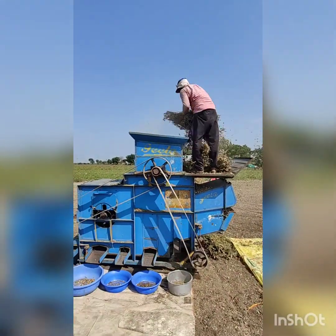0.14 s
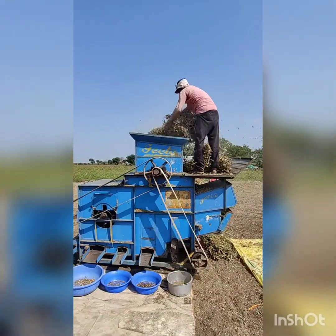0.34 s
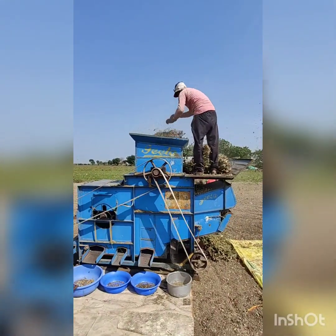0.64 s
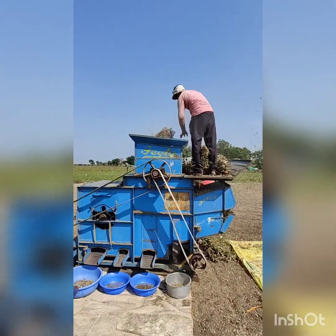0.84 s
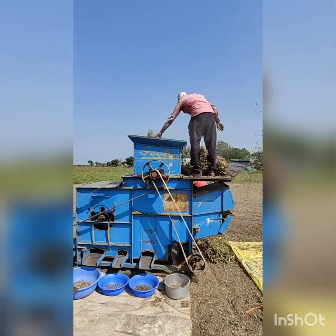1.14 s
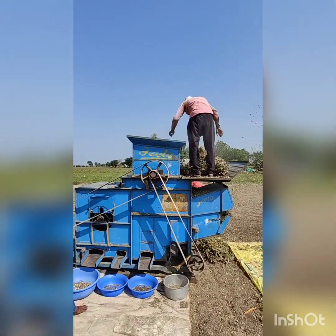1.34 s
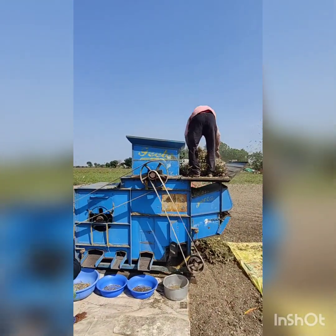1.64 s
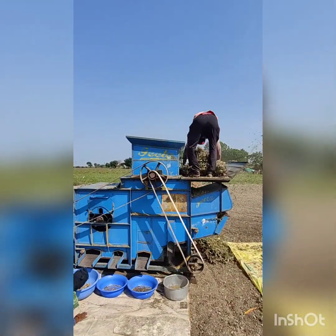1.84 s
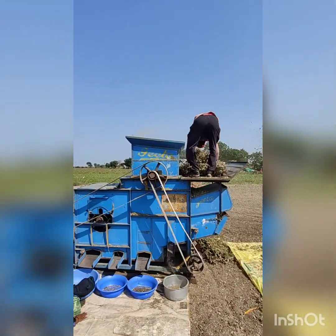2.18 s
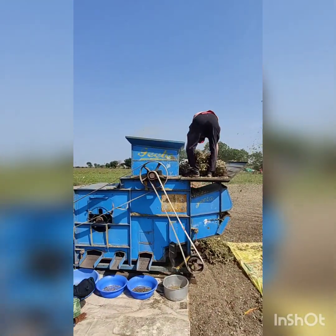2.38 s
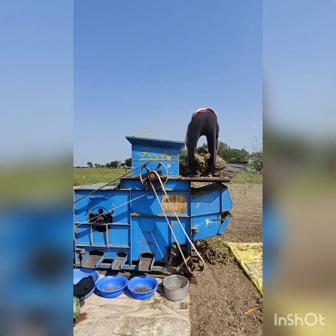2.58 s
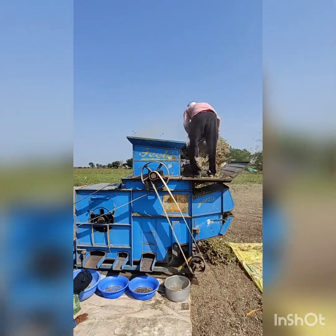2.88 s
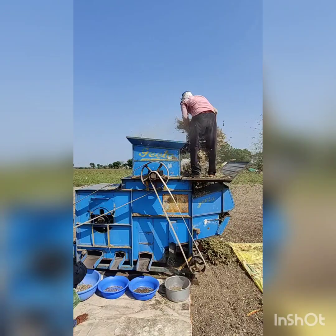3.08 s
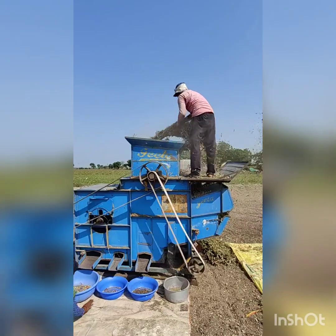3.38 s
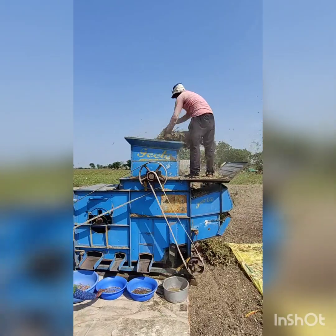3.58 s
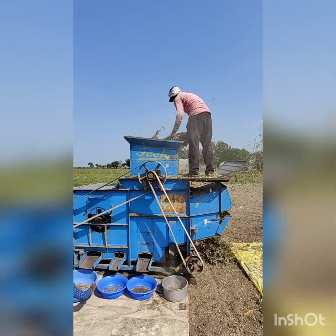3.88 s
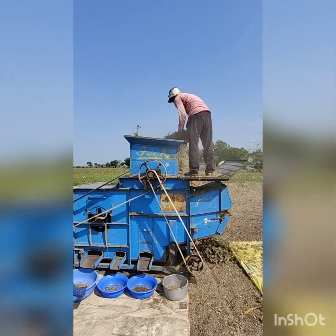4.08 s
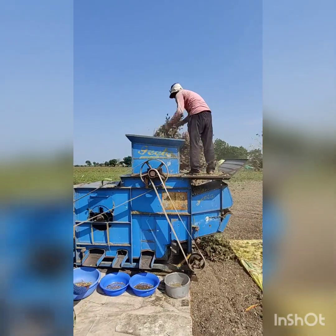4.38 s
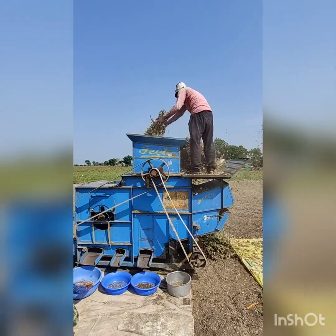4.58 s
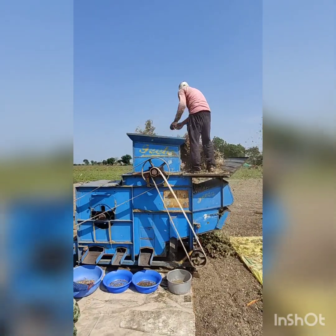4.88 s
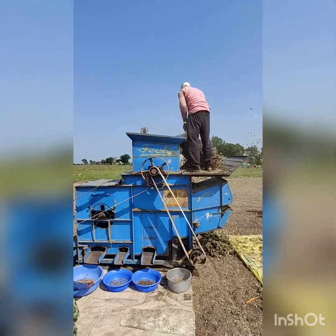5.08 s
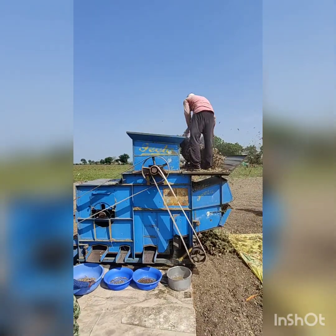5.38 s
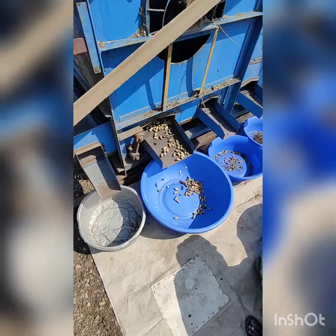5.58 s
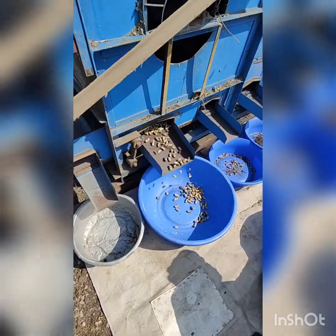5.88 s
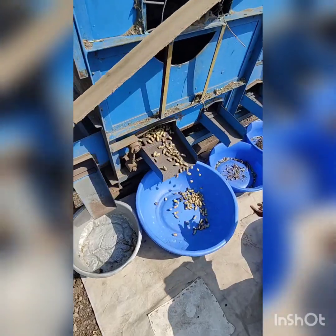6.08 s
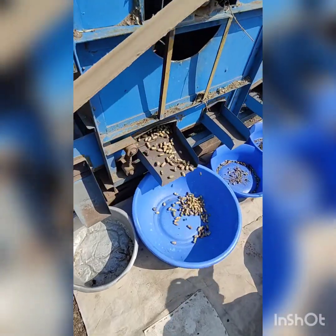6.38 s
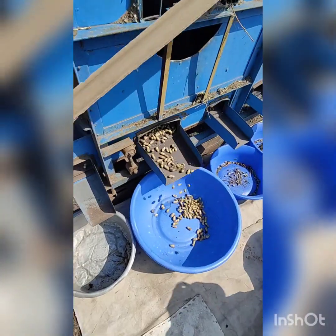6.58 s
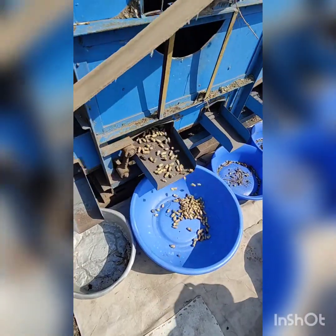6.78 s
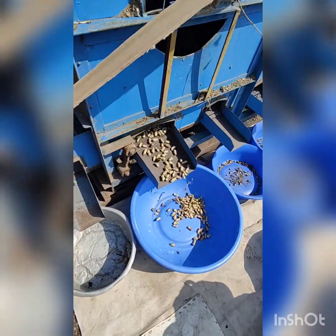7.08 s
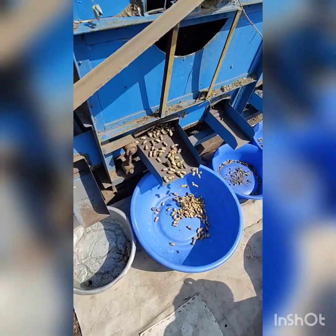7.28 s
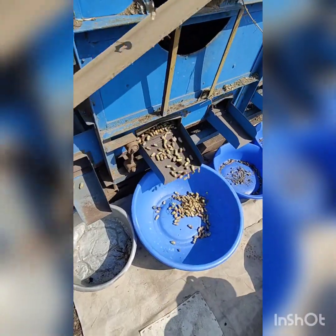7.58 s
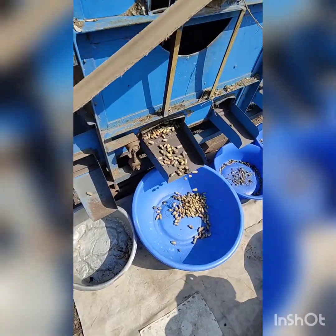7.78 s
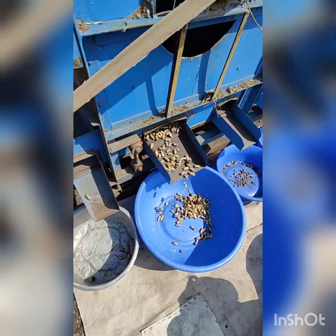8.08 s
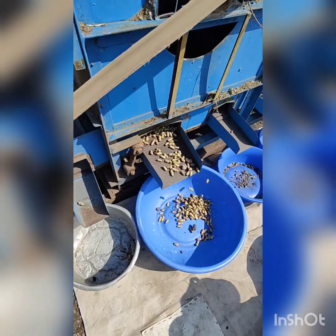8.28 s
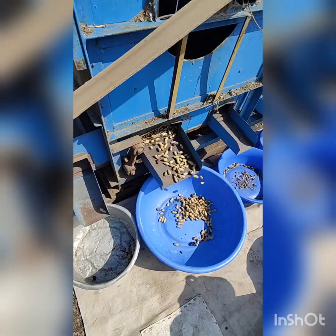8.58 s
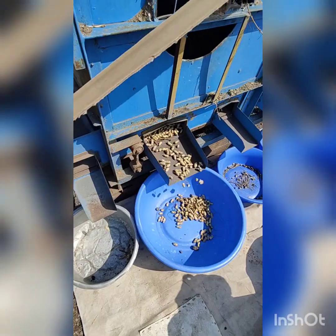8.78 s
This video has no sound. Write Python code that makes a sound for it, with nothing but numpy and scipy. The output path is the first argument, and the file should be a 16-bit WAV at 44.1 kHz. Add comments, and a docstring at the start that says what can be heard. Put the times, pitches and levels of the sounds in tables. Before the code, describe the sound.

A slow diesel engine chugs as a belt-driven thresher rattles outdoors, first from a few metres away, then louder up close.

```python
"""A slow single-cylinder diesel chugs in an open field and drives a peanut thresher through a flat belt.
Each firing pops the pipe, hisses and thumps; the intake gulps, the linkage chatters and the belt chirps.
The belt's steel joint slaps the pulleys and its slack side flutters. Underneath, the drum hums,
panels rumble, pods rattle and straw hisses. The machine is heard first from a few metres away
and, after a short fade to silence, from beside the outlet chute."""
import sys
import numpy as np
from scipy import signal
from scipy.fft import rfft, irfft, next_fast_len
from scipy.io import wavfile
from scipy.ndimage import map_coordinates

SR = 44100
rng = np.random.default_rng(int(sys.argv[2]) if len(sys.argv) > 2 else 0)


def generate_wav(signal):
    """Clip the signal to [-1, 1] and save it as 16-bit WAV at the path in sys.argv[1]."""
    frames = np.transpose(np.atleast_2d(signal))
    scaled = np.clip(frames, -1, 1) * 32767
    pcm = np.round(scaled).astype(np.int16)
    wavfile.write(sys.argv[1], SR, pcm)


N = 394236

# hum of the unbalanced drum, much stronger close up: time_s, level_db
DRUM_HUM = [(5.7, -44), (6.1, -31), (8.94, -31.5)]
# partials of that hum: multiple_of_drum_speed, level_db
DRUM_ORDERS = [(1, -3.5), (2, -11.5), (3, -11)]
# the thresher's load: time_s, pods_db, straw_db
LOAD_FAR = [(0.0, -39.5, -41.5), (0.77, -38, -43), (1.3, -38, -40), (3.76, -38.5, -41.5),
            (4.53, -38.5, -40.5), (4.87, -39, -42.5), (5.25, -39, -38)]
LOAD_NEAR = [(5.92, -30.5, -32), (6.05, -29, -33), (6.96, -31, -37.5), (7.28, -29.5, -37.5),
             (7.56, -32, -35.5), (8.32, -32.5, -39.5), (8.9, -32.5, -37)]
# plants entering the drum: peak_s, level_db, width_s
ARMFULS = [(1.476, -40, .07), (4.56, -35.5, 0.094), (7.33, -39, 0.11)]
# tone of the sheet panels: frequency_hz, level_db
RUMBLE_FAR = [(10, -32), (28, -13.5), (45, -1.5), (90, -1.5), (130, -2), (205, -7.5), (245, -3),
              (300, -6.5), (400, -14.5), (700, -32), (2000, -91)]
RUMBLE_NEAR = [(10, -29), (28, -8), (50, -2.5), (90, -3.5), (150, -6.5), (195, -1.5), (235, -3.5),
               (280, -9), (400, -13), (700, -20), (2000, -94)]
# tone of pods on the sieves: frequency_hz, level_db
RATTLE_FAR = [(150, -9), (420, -2), (600, 1.5), (740, 3.5), (1000, -1.5), (1300, -2.5), (1520, -12),
              (2300, -5), (2800, -12.5), (4200, -10.5), (5500, -26), (9000, -11.5)]
RATTLE_NEAR = [(150, -11), (420, -8), (520, 5), (740, 0), (850, -1), (1300, -4), (1520, -10.5), (2400, -7),
               (3200, -12.5), (4200, -12), (5500, -21.5), (9000, -17)]
# tone of blown straw, a falling pod, shredding plants and the slack belt: frequency_hz, level_db
STRAW_TONE = [(1500, 4), (4500, -3), (6500, -5), (8000, -1.5), (10000, -2.5), (16000, -9)]
POD_TONE = [(500, -20), (1500, -9), (2000, -5.5), (2400, 8), (3100, -5), (3700, -6.5), (4350, 8),
            (5200, -2), (9000, -5), (16000, -3.5)]
SHRED_TONE = [(1500, -20), (4000, -9), (7000, -3.5), (9500, 1), (16000, 0.5)]
FLUTTER_TONE = [(15, -37), (40, -10.5), (70, 1.5), (95, -0.5), (140, -8.5), (300, -41), (1000, -90)]

# surges of the slack belt: peak_s, level_db, width_s
BELT_SURGES = [(.65, -35.5, 0.24), (1.55, -33.5, 0.22), (3.55, -32, 0.1), (3.98, -36, 0.092),
               (5.46, -32, 0.026), (6.1, -30, .1), (7.14, -23, 0.046), (7.33, -24.5, 0.043)]
# ring of the steel belt fastener and pulley: pitch_hz, bandwidth_hz, level_db
JOINT_FAR = [(2280, 270, 1), (3170, 500, 0.5), (4660, 590, 1), (5600, 260, -7), (6780, 600, -5.5)]
JOINT_NEAR = [(2390, 120, -12), (2720, 430, -0.5), (4360, 210, 0.5), (5160, 230, -10), (7230, 500, -8)]
# how hard the joint strikes: time_s, level_db
SLAP_FAR = [(.8, -28.5), (1.35, -24), (2.6, -29), (3.6, -31.5), (4.8, -26), (5.3, -29.5)]
SLAP_NEAR = [(6.1, -16), (6.55, -23), (7.4, -14.5), (7.85, -22), (8.3, -18.5), (8.7, -20)]
# belt slips hard enough to squeak: peak_s, level_db, pitch_hz
SQUEAKS = [(.360, -33, 5800), (.986, -36, 5380), (1.188, -38.5, 6550), (1.614, -34, 5520),
           (2.028, -39, 5800), (2.449, -44, 6600), (2.660, -36, 5610), (4.345, -34, 5870),
           (4.766, -36, 5740), (4.976, -32, 5600), (5.185, -38, 6500), (5.394, -35, 5900),
           (6.749, -33, 6950), (6.959, -27.5, 5560), (7.590, -31, 5700), (7.799, -34, 6100),
           (8.217, -35, 5660), (8.426, -34, 5700), (8.637, -29, 5720), (8.841, -34, 5680)]

# engine speed as the governor hunts: time_s, firing_rate_hz
SPEED_FAR = [(0, 4.764), (1, 4.8009), (2, 4.7786), (2.6, 4.7388), (3.2, 4.7897), (3.8, 4.7141),
             (4.3, 4.7538), (5.4, 4.7089)]
SPEED_NEAR = [(5.7, 4.7972), (6.3, 4.7389), (6.9, 4.8022), (7.4, 4.7599), (8.8, 4.8227)]
# valve gear and linkage chatter after each firing: delay_s, level_db, width_s
LINKAGE = [(0.056, -20.5, 0.0058), (0.072, -13.5, 0.0085), (.131, -18, .005)]
# strength of the exhaust: time_s, level_db
EFFORT_FAR = [(0, -27), (1.4, -25), (2.8, -26.5), (3.3, -28.5), (3.9, -26), (5.4, -26.5)]
EFFORT_NEAR = [(5.92, -15.5), (6.13, -18.5), (7, -18.5), (7.65, -21.5), (8.2, -19.5), (8.85, -21)]
# ring of the exhaust pipe and silencer: pitch_hz, level_db, t60_s
PIPE_FAR = [(292, 2, 0.057), (359, -6.5, 0.1), (640, 1, 0.026), (692, -8.5, 0.029), (1020, -13, .025),
            (1350, -10, 0.027)]
PIPE_NEAR = [(210, -5, 0.058), (254, 1.5, 0.062), (396, -13.5, 0.031), (485, -4.5, 0.036),
             (656, 0.5, 0.049), (976, -3.5, 0.017)]
# tone of the gas jet, shared by the linkage: frequency_hz, level_db
HISS_FAR = [(200, -24), (700, 5.5), (900, -7.5), (1280, 8), (1520, -11.5), (1800, 5.5), (2100, -1.5),
            (2450, -2.5), (2800, -6.5), (3200, -5.5), (5000, -4), (7000, -5.5), (11000, -3), (16000, -13)]
HISS_NEAR = [(200, -10), (600, 0), (1200, -0.5), (1500, -3.5), (1800, 1.5), (2800, -7.5), (4200, -6),
             (5600, -9.5), (7500, -5), (10000, -7.5), (16000, -7.5)]

# colour of the microphone port: frequency_hz, gain_db
MIC_EQ = [(4600, 0), (5850, -2), (6500, 7), (7500, 4.5), (9000, -3), (12400, -2.5), (13200, 1.5),
          (16000, -1)]
# the fade between the two places: time_s, gain_db
FADE = [(5.495, -1.5), (5.52, -84), (5.6, -68), (5.66, -45), (5.685, -23.5), (5.715, -9), (5.8, -1.5),
        (5.89, 1)]


def amp(db):
    """Decibels to gain."""
    return 10 ** (np.asarray(db) / 20)


def unit(x):
    """Scale to rms 1."""
    return x / np.sqrt(np.mean(x ** 2) + 1e-20)


def clock():
    """The time of each sample."""
    return np.arange(N) / SR


def curves(rows):
    """An automation curve for each column after the time."""
    time_s, *columns = np.transpose(rows)
    return [np.interp(clock(), time_s, column) for column in columns]


def wobble(rate):
    """A smooth random curve, rate knots a second."""
    return map_coordinates(rng.standard_normal(int(N * rate / SR) + 4), [clock() * rate])


def filtered(x, response):
    """x through a frequency response."""
    size = next_fast_len(N + 8192)
    return irfft(rfft(x, size) * response(np.fft.rfftfreq(size, 1 / SR)), size)[:N]


def coloured(x, tone):
    """x through an EQ curve drawn on a log frequency axis."""
    points_hz, db = np.transpose(tone)
    return filtered(x, lambda hz: amp(np.interp(np.log(hz + 1), np.log(points_hz), db)))


def noise(tone):
    """Coloured noise of rms 1."""
    return unit(coloured(rng.standard_normal(N), tone))


def bell(t, width):
    """A smooth bump around t = 0."""
    return np.exp(-.5 * (t / width) ** 2)


def swells(rows):
    """An envelope with one smooth bump for each row."""
    return sum(amp(db) * bell(clock() - peak_s, width_s) for peak_s, db, width_s in rows)


def nearest(times):
    """For each sample, the number of the nearest event and the time since it (negative before it)."""
    index = np.searchsorted((times[1:] + times[:-1]) / 2, clock())
    return index, clock() - times[index]


def impacts(rate, spread_db, life_s):
    """Random small collisions, rate a second, each a short dying burst; rms 1."""
    hits = (rng.random(N) < rate / SR) * amp(spread_db * np.clip(rng.standard_normal(N), -2, 2))
    power = signal.lfilter([1], [1, -np.exp(-2 / (life_s * SR))], hits ** 2)
    return unit(np.sqrt(power) * rng.standard_normal(N))


def engine_cycles(speed, start_s):
    """For each sample, the engine cycles run since the firing at start_s."""
    cycles = np.cumsum(curves(speed)[0]) / SR
    return cycles - np.interp(start_s, clock(), cycles)


def recurring(cycles, first, every):
    """The times of something that comes round every so many engine cycles."""
    lap = np.floor((cycles - first) / every)
    return clock()[1:][np.diff(lap) > 0]


def drum(speed_hz):
    """The unbalanced drum hums at its turning speed and its overtones, wavering slightly."""
    turns = np.cumsum(speed_hz * (1 + 0.0041 * wobble(1.744))) / SR
    partials = sum(amp(db + 0.61 * wobble(2.7)) * np.sin(2 * np.pi * (order * turns + rng.random()))
                   for order, db in DRUM_ORDERS)
    return np.sqrt(2) * amp(curves(DRUM_HUM)[0]) * partials


def falling_pods(rate, tick_db):
    """Single dry pods tick against metal and plastic."""
    return amp(tick_db) * unit(coloured(impacts(rate, spread_db=3, life_s=.0015), POD_TONE))


def feed():
    """Armfuls of dry plants are shredded in the drum: each is a swell of bright hiss."""
    return swells(ARMFULS) * noise(SHRED_TONE)


def thresher(load, rumble_tone, rattle_tone, rumble_db, rattle_db, straw_db):
    """Sheet panels rumble and pods drum on the sieves with the load; straw hisses through the blower."""
    pod_load, straw_load = curves(load)
    shaking_db = pod_load.mean() + 1.4 * (pod_load - pod_load.mean())  # swings wider than the load
    panels = amp(shaking_db + rumble_db + 1.44 * wobble(30)) * noise(rumble_tone)
    blows = impacts(rate=550, spread_db=3.5, life_s=.008)
    crackle = impacts(rate=2200, spread_db=3.5, life_s=.003)
    pods = amp(pod_load + rattle_db + 0.68 * wobble(5)) * unit(coloured(blows, rattle_tone))
    straw = amp(straw_load + straw_db + 0.82 * wobble(5)) * unit(coloured(crackle, STRAW_TONE))
    return panels + pods + straw


def belt_flutter(idle_db, surge_db):
    """The slack side of the long belt flutters gently, with low surges now and then."""
    envelope = amp(idle_db) + amp(surge_db) * swells(BELT_SURGES)
    return envelope * amp(1.8 * wobble(15)) * noise(FLUTTER_TONE)


def slip_note(hz, width_hz):
    """Stick and slip is irregular, so its note is a narrow band of noise."""
    roughness = amp(2.8 * wobble(300))
    return roughness * np.sin(2 * np.pi * np.cumsum(hz + width_hz * wobble(1400)) / SR)


def belt_scuffs(firings, scuff_db, scuff_hz):
    """The belt slips a little as each power stroke jerks the pulley: a faint high scuff."""
    index, t = nearest(firings)
    gain = amp(scuff_db + 3 * rng.standard_normal(len(firings)))
    return gain[index] * bell(t + 0.0081, 0.0071) * slip_note(scuff_hz, width_hz=400)


def belt_squeaks(squeak_db, width_s, sag_hz_per_s):
    """On some strokes the slip grows into a short rough squeak, its pitch falling as the slip slows."""
    times, db, hz = np.transpose(SQUEAKS)
    index, t = nearest(times)
    note = slip_note(hz[index] - sag_hz_per_s * t, width_hz=240)
    return amp(db[index] + squeak_db) * bell(t, width_s) * note


def belt_joint(cycles, strength, modes, first_cycle, lap_cycles, slap_db, t60_s):
    """Once a lap the steel fastener cracks against each of the two pulleys and rattles briefly."""
    pulley_gap_cycles = 2.16
    strikes = [recurring(cycles, first_cycle + gap, lap_cycles) for gap in (0, pulley_gap_cycles)]
    _, t = nearest(np.sort(np.concatenate(strikes)))
    steel = lambda hz: sum((-1) ** k * amp(db) * 1j * hz * width / (pitch**2 - hz**2 + 1j * hz * width)
                           for k, (pitch, width, db) in enumerate(modes))
    ring = unit(filtered(rng.standard_normal(N), steel))
    crack = amp(-60 * np.abs(t) / 0.035)
    rattle = amp(-8.5 - 60 * np.abs(t) / t60_s)
    return (t > 0) * amp(curves(strength)[0] + slap_db) * (crack + rattle) * ring


def linkage(firings, tone, chatter_db):
    """Loose parts chatter at set points of the engine cycle, never twice alike."""
    envelope = np.zeros(N)
    for delay_s, db, width_s in LINKAGE:
        time_scatter, level_scatter = rng.standard_normal((len(firings), 2)).T
        index, t = nearest(firings + delay_s + 0.0038 * time_scatter)
        envelope += amp(db + 1.5 * level_scatter)[index] * bell(t, width_s)
    chatter = unit(coloured(impacts(rate=800, spread_db=1, life_s=0.0033), tone))
    return amp(chatter_db) * envelope * chatter


def intake(firings, gulp_db, delay_s=.069, pitch_hz=234, t60_s=0.062):
    """A third of a cycle after the exhaust, the engine draws air with a soft hollow gulp."""
    index, t = nearest(firings + delay_s)
    age = np.maximum(t, 0)
    gain = amp(gulp_db + 2 * rng.standard_normal(len(firings)))
    return gain[index] * amp(-60 * age / t60_s) * np.sin(2 * np.pi * pitch_hz * age)


def exhaust(firings, effort, pipe, hiss_tone, jet_width_s, thump_db, echo_s):
    """The valve opens with a pop that rings the pipe; a jet of gas follows, then a low thump."""
    index, t = nearest(firings)
    scatter = lambda: rng.standard_normal(len(firings))[index]  # one draw per firing
    age = np.maximum(t, 0)
    ring = np.zeros(N)
    for hz, db, t60_s in pipe:
        decay = amp(db + 1.5 * scatter() - 60 * age / t60_s)
        ring += decay * np.cos(2 * np.pi * hz * (1 + 0.018 * scatter()) * t)
    valve_opening = (1 + np.tanh(t / .00035)) / 2
    pop = ring * valve_opening
    # the jet swells and collapses quickly; the machine's panels scatter a short tail
    jet_t = t - .0102
    attack = (1 + np.tanh((t - .0046) / .002)) / 2
    tail = 0.17 * (jet_t > 0) * np.exp(-np.abs(jet_t) / 0.028)
    flow = attack * bell(jet_t, jet_width_s) + tail
    # its reflection off the ground combs the hiss into a hollow clack
    gas = unit(filtered(noise(hiss_tone), lambda hz: 1 + 0.27 * np.exp(-2j * np.pi * hz * echo_s)))
    hiss = amp(1 + 0.64 * scatter() + wobble(900)) * flow * gas
    # one slow swing of the engine's frame
    swing_t = t - .0297
    thump = amp(thump_db + 2.5 * scatter()) * bell(swing_t, 0.0068) * np.sin(2 * np.pi * 62 * swing_t)
    return amp(curves(effort)[0]) * (pop + hiss + thump)


def from_afar():
    """The machine from a few metres away."""
    cycles = engine_cycles(SPEED_FAR, start_s=.1526)
    firings = recurring(cycles, first=0, every=1)
    return (exhaust(firings, EFFORT_FAR, PIPE_FAR, HISS_FAR,
                    jet_width_s=0.0056, thump_db=-1.1, echo_s=.00123)
            + thresher(LOAD_FAR, RUMBLE_FAR, RATTLE_FAR, rumble_db=1.67, rattle_db=0.04, straw_db=1.5)
            + belt_joint(cycles, SLAP_FAR, JOINT_FAR,
                         first_cycle=-.683, lap_cycles=4.149, slap_db=-2, t60_s=0.15)
            + intake(firings, gulp_db=-37.5)
            + belt_scuffs(firings, scuff_db=-46, scuff_hz=7030)
            + linkage(firings, HISS_FAR, chatter_db=-28)
            + falling_pods(rate=30, tick_db=-57))


def at_the_chute():
    """The machine from beside the outlet, where the pods drop into a basin."""
    cycles = engine_cycles(SPEED_NEAR, start_s=5.708)
    firings = recurring(cycles, first=0, every=1)
    return (exhaust(firings, EFFORT_NEAR, PIPE_NEAR, HISS_NEAR,
                    jet_width_s=0.0052, thump_db=-4, echo_s=.0029)
            + thresher(LOAD_NEAR, RUMBLE_NEAR, RATTLE_NEAR, rumble_db=.5, rattle_db=-2.4, straw_db=-1.5)
            + belt_joint(cycles, SLAP_NEAR, JOINT_NEAR,
                         first_cycle=1.882, lap_cycles=4.155, slap_db=-5.5, t60_s=0.14)
            + intake(firings, gulp_db=-25.5)
            + belt_scuffs(firings, scuff_db=-41, scuff_hz=6900)
            + linkage(firings, HISS_NEAR, chatter_db=-22.5)
            + falling_pods(rate=45, tick_db=-46))


def scene():
    """The same machine in the open air, cutting from the wide perspective to the close one."""
    cut_s = 5.6
    machine = np.where(clock() < cut_s, from_afar(), at_the_chute())
    squeaks = belt_squeaks(squeak_db=4.5, width_s=0.0058, sag_hz_per_s=20000)
    flutter = belt_flutter(idle_db=-51, surge_db=-3.5)
    return (machine + squeaks + flutter + feed() + drum(speed_hz=45.3))[None]


def record(dry):
    """Microphone colour, the fade between the two places and a steep high cut."""
    high_cut_hz = 15830
    faded = coloured(dry[0], MIC_EQ) * amp(curves(FADE)[0])
    return filtered(faded, lambda hz: np.clip((high_cut_hz - hz) / 160 + .5, 0, 1))[None]


dry = scene()
out = record(dry)
generate_wav(out)
```